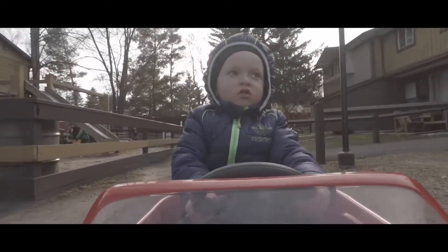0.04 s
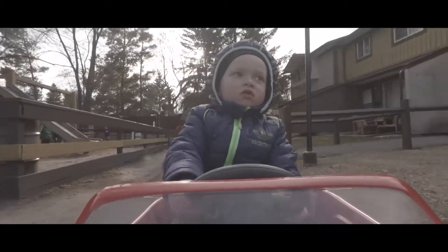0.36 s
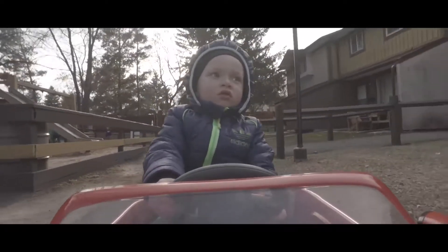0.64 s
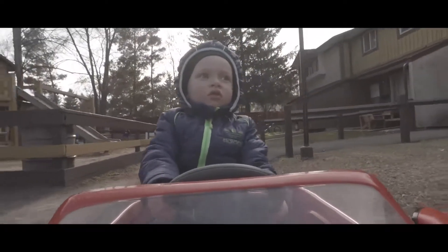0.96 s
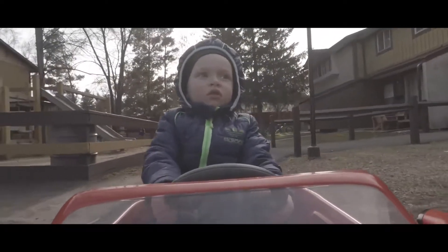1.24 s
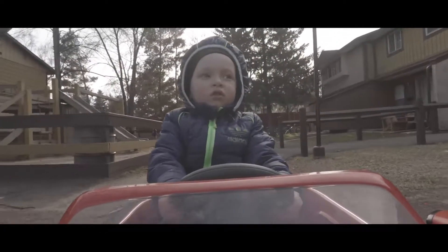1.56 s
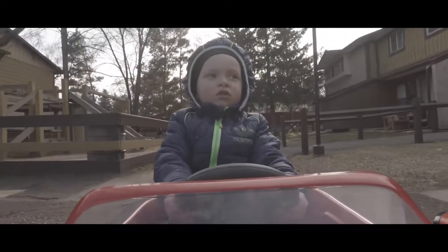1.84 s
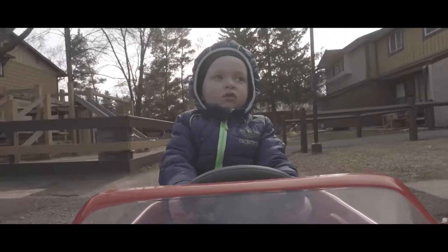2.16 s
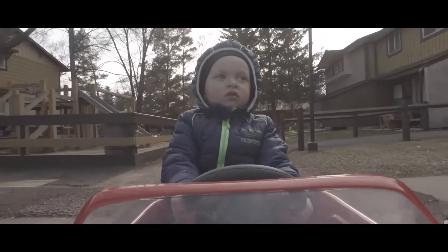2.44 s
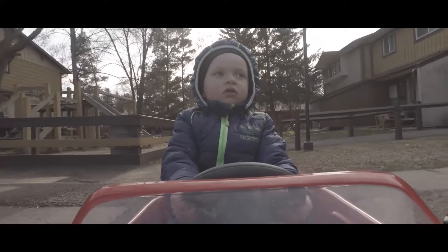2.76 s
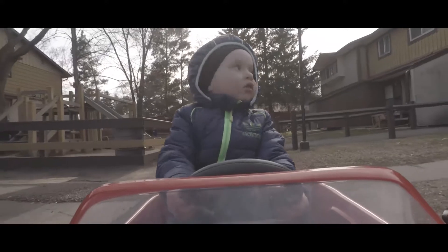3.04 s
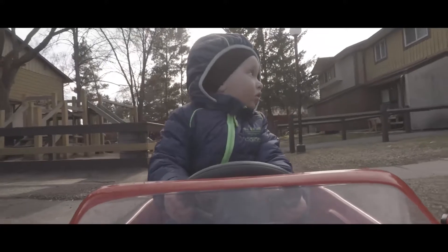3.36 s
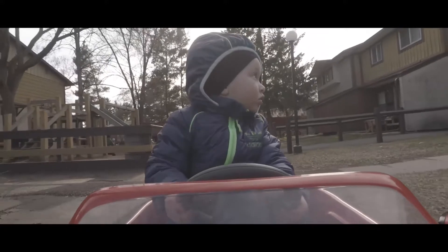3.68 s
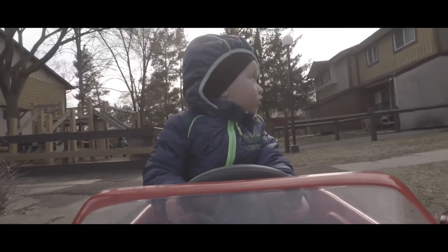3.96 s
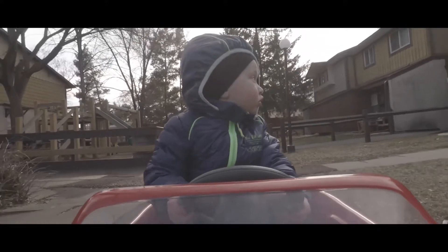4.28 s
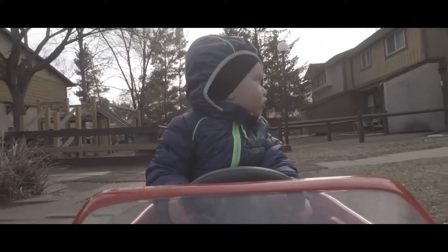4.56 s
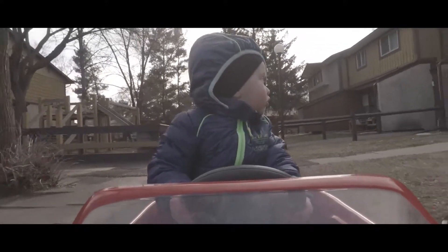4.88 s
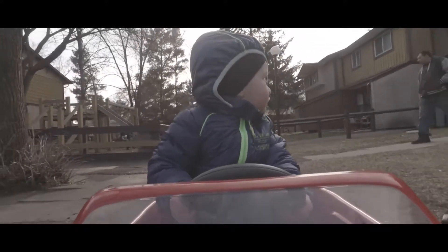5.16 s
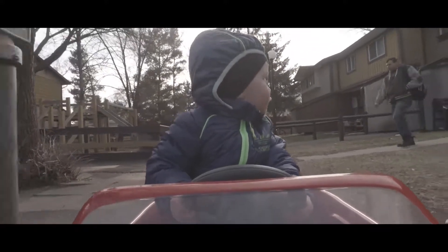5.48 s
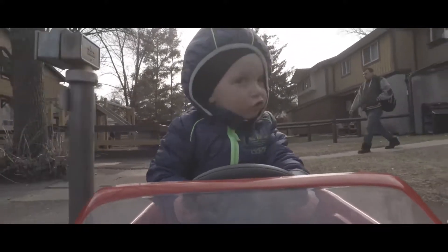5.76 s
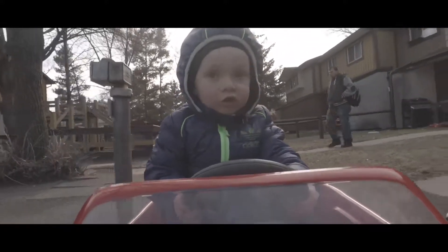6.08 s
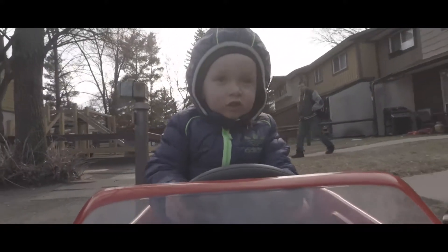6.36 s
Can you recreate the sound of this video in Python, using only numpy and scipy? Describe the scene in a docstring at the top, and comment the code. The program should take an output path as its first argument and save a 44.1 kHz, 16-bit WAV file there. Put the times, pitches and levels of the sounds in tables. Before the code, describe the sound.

A child's electric ride-on car rolls along a paved path, heard up close from its bonnet. Hard plastic wheels crunch over grit and make the hollow body boom. The gear whine climbs in the first second, with thin squeals, while bumps thump and clatter. The car eases off slightly as stones and loose parts tick, then picks up again, takes two heavier thumps and keeps rolling.

```python
"""A child drives a small electric ride-on car along a paved path, heard from its bonnet.
From the start, hard plastic wheels crunch over grit and set the hollow body booming. In the first
second the gear whine climbs with the speed, thin squeals come and go, and bumps thump and clatter.
The car eases off while stones and loose parts tick, then picks up again after 3.3 s. The heaviest
thumps land near 3.7 s and 4.9 s, and it is still rolling when the sound ends at 6.5 s."""
import sys
import numpy as np
from scipy import signal
from scipy.fft import rfft, irfft, next_fast_len
from scipy.io import wavfile
from scipy.ndimage import uniform_filter1d

SR = 44100
rng = np.random.default_rng(int(sys.argv[2]) if len(sys.argv) > 2 else 0)


def digitize_waveform(pressure):
    """Quantize a signal to 16-bit integers and store it at the path in sys.argv[1].

    Rows of a 2-D input are taken as channels; values are limited to [-1, 1].
    """
    field = np.atleast_2d(pressure).T
    bounded = np.clip(field, -1, 1)
    quanta = np.round(bounded * 32767).astype(np.int16)
    wavfile.write(sys.argv[1], SR, quanta)


N = 287532
TIME = np.arange(N) / SR

# Levels in the tables are relative: each layer adds its own trim.
# EQ of the hiss: freq_hz, gain_db
HISS_EQ = [(3000, 7.5), (7000, -6), (9300, 1), (11500, -5.5), (14000, -9.5), (15500, -11)]
# grains snapping under a wheel: start_s, peak_db
SNAP_CUES = [(0.2458, -45), (2.146, -56), (2.2185, -51), (3.6905, -48), (3.931, -55), (4.155, -52),
             (4.5376, -56), (5.9219, -56), (6.03, -50)]
# stones and loose parts ticking: start_s, crack_db, ping_db, pitch_hz, decay_s
TICK_CUES = [(0.2464,-27,-28,4400,0.0027), (.253,-26,-18.5,1250,0.0033), (0.553,-28,-35,3770,.003),
             (.843,-37,-39,3600,.003), (0.891,-34,-39,3740,.003), (1.1306,-41,-37,2000,.003),
             (1.34,-25.5,-37,4570,0.0045), (1.5294,-30.5,-43,3580,0.0026), (1.6284,-29,-37,3610,.003),
             (1.653,-29,-39,3500,.004), (1.906,-24,-37,3820,0.0018), (2.157,-39,-33,2100,.003),
             (2.2476,-26,-38,3350,0.0028), (2.419,-26,-39,3900,.003), (2.4455,-34,-37,4300,.003),
             (2.475,-36,-36.5,4230,0.0043), (2.5235,-29.5,-40,3840,0.0024), (3.124,-23.5,-31,3730,0.0025),
             (3.207,-30,-44,3650,0.0028), (3.2893,-24,-27.5,3860,0.0024), (3.408,-22.5,-29.5,4040,0.0043),
             (3.693,-27,-35.5,3310,0.012), (3.944,-35,-37,3670,.003), (4.156,-20,-31,2600,.003),
             (4.357,-27.5,-31.5,3290,.006), (4.4395,-28,-35,3600,0.0028), (4.7941,-27,-35,3870,0.0027),
             (5.2155,-26.5,-36,4500,.003), (5.2413,-29,-41,4200,.002), (5.2904,-32,-39,3600,.004),
             (5.3712,-23,-33,3750,0.013), (5.8416,-28,-37,4610,0.0036), (6.4445,-32,-37,3600,.003),
             (6.4693,-27.5,-38,2270,.003), (6.492,-24.5,-43,3500,.003)]
# squeals of the drive: start_s, length_s, from_hz, to_hz, level_db
SQUEAL_CUES = [(.12, 0.11, 4120, 4420, -49), (0.248, 0.18, 3520, 3540, -50),
               (0.286, 0.27, 1820, 1780, -44.5), (0.54, 0.21, 1630, 1570, -43),
               (0.558, .1, 1340, 1340, -42), (1.218, .13, 4300, 4200, -52), (0.82, 0.15, 4300, 4200, -53),
               (1.23, 0.28, 1350, 1355, -42.5), (3.057, 0.3, 2320, 2360, -53),
               (4.577, 0.16, 1910, 1880, -49.5)]
# bumps in the path: start_s, thump_db, pitch_hz, ring_s, clatter_db, crack_db
BUMP_CUES = [(.193,-27,318,.005,-24,-26), (0.244,-20.5,310,.006,-14.5,-18), (0.255,-7,306,0.0065,-20,-22.5),
             (0.334,-11.5,340,0.0058,-32,-40), (.372,-25,320,.004,-31,-28),
             (0.451,-22,323,0.0033,-18.5,-29), (.467,-4.5,295,0.0046,-27,-28), (0.608,-18,333,.004,-26,-38),
             (.652,-7.5,334,0.0037,-25.5,-28), (.722,-12,330,0.0052,-26,-36),
             (.768,-6.5,327,0.0046,-23,-36), (.783,-7.5,347.5,.016,-27,-23.5),
             (1.045,-19,324,0.0056,-22.5,-30), (1.197,-22,330,0.0049,-25,-29),
             (1.234,-11.5,341,0.012,-25,-28), (1.38,-13.5,306,0.0037,-22,-32),
             (1.412,-16,331,0.0095,-22,-26), (1.77,-11,336,.005,-21,-29), (2.125,-15.5,238,.012,-23,-38),
             (2.188,-11,335,0.004,-18,-29), (2.353,-24,313,.004,-29,-42), (2.48,-6.5,284,.003,-23.5,-26),
             (2.79,-23,315,0.0044,-26.5,-27.5), (2.828,-15,339,0.0088,-20.5,-35),
             (2.864,-18,320,0.0026,-23.5,-27), (3.208,-19,325,0.0037,-31,-38),
             (3.657,-21,315,.0044,-26,-30), (3.686,-18,315,0.0035,-21,-29),
             (3.697,-4,329,0.0052,-23.5,-23.5), (3.868,-13,278,.004,-25,-37),
             (3.978,-11.5,333,0.014,-21.5,-27.5), (4.049,-12.5,329,0.0099,-18.5,-37),
             (4.354,-8.5,302,0.0024,-29,-38), (4.365,-7.5,322,0.0094,-24.5,-29),
             (4.8,-4.5,325,0.0021,-37,-35), (4.853,-1,316,0.0032,-26,-31), (4.94,-15,316,.0036,-28,-30),
             (5.118,-12,315,0.004,-22.5,-33), (5.142,-18,320,0.0053,-24,-25.5), (5.25,-19,320,.005,-19,-28),
             (5.257,-6.5,303,0.0095,-24,-31), (5.581,-16,311,0.0044,-26,-36),
             (6.03,-13.5,330,0.0093,-21,-30), (6.238,-9,316.4,0.012,-20,-37.5),
             (6.29,-14,296,.0034,-19,-21.5), (6.436,-28,320,.004,-21,-24)]

# EQ of each kind of contact: freq_hz, gain_db
SNAP_EQ = [(2000, -1), (5000, 5.5), (6900, 3.5), (7800, 6), (8700, -2.5), (10500, -6.5), (13000, -5),
           (15500, -14)]  # very bright
TICK_EQ = [(700, -22.5), (1500, 0), (2500, 1.5), (3400, 0.5), (4400, 2.5), (5600, -13.5), (7000, -25),
           (10000, -35), (13000, -34), (16000, -42.5)]  # hard upper mids
GRIT_EQ = [(900, -26), (1600, 8), (2250, 6), (2900, -2.5), (3450, 7.5), (3850, -3.5), (4300, -2.5),
           (4900, -8), (5500, -10), (6000, -15), (6900, -25.5), (9000, -26.5), (11000, -41.5),
           (13000, -36.5), (15500, -38)]  # sandy crackle
CRUNCH_EQ = [(300, -30.5), (470, -0.5), (560, -1), (640, -3), (730, -5.5), (880, -7.5), (1050, -10),
             (1250, -9), (1450, -16), (1900, -21), (2600, -27), (4000, -25), (7000, -57), (15000, -56)]  # hollow mids

# resonances: pitch_hz, width_hz, gain_db
SWAY_MODES = [(26, 38, -9.5), (43.2, 23, -5), (58, 20, -0.5)]  # the car rocking on its wheels
BODY_MODES = [(75.86, 10, 5), (98, 16, -2), (112.7, 14, -2.5)]  # the whole hollow body
PAN_MODES = [(163.4, 17, -0.5), (173.8, 12, 0), (203.5, 24, -3.5)]  # the floor pan
PANEL_MODES = [(186, 57, 1), (239.6, 26, 1.5), (285.4, 31, 3), (309.3, 39, 1), (337, 20, 5.5),
               (403, 22, -1)]  # the plastic panels
WHEEL_MODES = [(547, 13, 7), (597.4, 25, 0.5), (653.5, 36, 1.5), (739, 25, 2.5), (1030, 47, -1)]  # the hollow wheels
PEBBLE_MODES = [(1950, 760, -1), (2460, 1400, -0.5), (3200, 370, -2), (3600, 530, 1.5), (4220, 890, -3)]  # clicks of larger stones

# level rides of the ringing plastic: time_s, level_db
LOW_BOOM_RIDE = [(0.0, -11.5), (0.86, -21), (0.99, -15.5), (1.18, -25), (1.35, -15.5), (1.89, -16.5),
                 (2.17, -8.5), (2.52, -21.5), (2.63, -7), (2.87, -20), (3.11, -13.5), (3.36, -21),
                 (3.48, -8.5), (3.58, -29.5), (3.79, -5), (3.92, -12), (4.06, -8), (4.26, -24),
                 (4.39, -5.5), (4.53, -15.5), (4.95, -5.5), (5.13, -18), (5.97, -14), (6.06, -17),
                 (6.2, -12.5), (6.51, -10)]  # lowest body mode
HIGH_BOOM_RIDE = [(0.0, -14.5), (0.28, -13), (0.45, -9.5), (0.68, -25), (0.79, -14), (1.16, -19),
                  (1.42, -12), (1.62, -21), (2.03, -10.5), (2.13, -15), (2.53, -16.5), (2.65, -23),
                  (2.79, -8), (3.01, -16), (3.11, -18), (3.45, -13.5), (3.63, -9.5), (3.72, -20.5),
                  (3.91, -11), (4.11, -17), (4.24, -12), (4.42, -12), (4.74, -15), (4.98, -18.5),
                  (5.1, -12.5), (6.51, -14)]  # upper body modes
PAN_RIDE = [(0,-27), (.35,-29.5), (.75,-24.5), (1.1,-35.5), (3.4,-34), (3.7,-25.5), (4.1,-29), (4.4,-23),
            (4.6,-32.5), (5.5,-30.5), (6.52,-38)]  # boom of the floor pan
WHEEL_RIDE = [(0.0, -38.5), (0.23, -29.5), (0.36, -45), (0.76, -40), (0.78, -33), (1.22, -39),
              (1.27, -34.5), (1.94, -40), (2.14, -29.5), (2.32, -37.5), (3.0, -35), (3.03, -41),
              (3.63, -33), (3.7, -24), (3.74, -35.5), (4.34, -32.5), (4.38, -24), (4.43, -48), (4.68, -40),
              (4.7, -35.5), (5.34, -35), (5.48, -46), (5.63, -35.5), (6.17, -37), (6.34, -28.5),
              (6.52, -46)]  # drone of the wheels
# roughness of the paving, as the levels it raises: time_s, drumming_db, crunch_db
PAVING_RIDE = [(0.0, -24.5, -39), (0.2, -16.5, -33), (0.49, -21.5, -37), (0.87, -22.5, -34),
               (1.03, -20.5, -35), (1.22, -23.5, -37), (1.83, -23, -37.5), (2.2, -20, -34),
               (2.49, -21.5, -40), (2.76, -25.5, -37), (3.18, -23, -37), (3.58, -22, -38),
               (3.94, -20.5, -37.5), (4.23, -20, -37), (4.39, -19.5, -35), (4.59, -22.5, -40.5),
               (4.78, -20.5, -36.5), (4.92, -23, -36), (5.21, -17, -32), (5.43, -21.5, -36.5),
               (6.19, -21, -36.5), (6.52, -21, -34)]
# load on the gears, as levels of partials 1-3 and 4-5: time_s, whine_db, whistle_db
LOAD_RIDE = [(0,-37,-48), (.34,-42.5,-46), (.47,-49.5,-49), (.75,-41,-52), (1.03,-41,-48), (1.08,-42,-45),
             (1.4,-40.5,-43), (2.0,-49,-45.5), (2.5,-42.5,-42), (3.2,-44.5,-45), (3.55,-43.5,-40),
             (4.2,-45.5,-48), (4.55,-45,-51), (4.85,-41,-39.5), (5.35,-46,-43.5), (5.9,-40,-43.5),
             (6.35,-40.5,-49), (6.52,-55,-41)]

# speed of the drive, as gear teeth meeting per second: time_s, mesh_hz
MESH_RATE = [(0,1020),(.13,1040),(.17,1095),(.25,1085),(.28,1168),(.38,1187),(.5,1290),(.68,1355),(1,1303),(1.15,1258),(1.5,1224),(1.95,1257),(3.3,1208),(3.5,1275),(3.65,1302),(4.5,1368),(5.4,1275),(5.62,1305),(5.85,1268),(6.3,1320),(6.52,1380)]
# the two rear gearboxes: speed_ratio, gain_db
REAR_DRIVES = [(1, -1), (1.016, -8)]
# partials of the tooth rate: harmonic, gain_db, roughness at full rattle
GEAR_PARTIALS = [(1, -1, 0.57), (2, -3.5, 0.38), (3, -6, 0.58), (4, -2, 1.1), (5, -13, 0.35)]
# how the gear housing radiates: freq_hz, gain_db
HOUSING_EQ = [(1000, -3.5), (1120, 4.5), (1250, -6.5), (1400, -7), (2080, -0.5), (2220, 5.5), (2310, -6.5),
              (2400, -5), (2510, -3.5), (2600, -1.5), (2700, -4.5), (3100, -4), (3330, -2.5), (3480, 3.5),
              (3560, 4), (3720, -0.5), (3900, -4), (4300, -8.5), (4600, -11), (4900, -30.5), (5400, -12),
              (5850, -4.5), (6200, -6.5), (6450, -12.5), (6700, -20), (8500, -23.5)]

PINION_TEETH, IDLER_RATIO = 17, 5.15  # tooth contacts per cycle of the rotor and of the idler hum


def from_db(db):
    """Decibels to gain."""
    return 10 ** (np.asarray(db) / 20)


def rms_one(x):
    """Scale to unit power."""
    return x / np.sqrt(np.mean(x ** 2) + 1e-20)


def leveller(x, seconds):
    """Hold a signal near unit power over a sliding window."""
    power = np.abs(uniform_filter1d(x * x, max(int(seconds * SR), 2)))
    return x / np.sqrt(power + 1e-12)


def automation(rows):
    """Each column of a timed curve, at every sample."""
    times, *columns = np.transpose(rows)
    return [np.interp(TIME, times, column) for column in columns]


def eq_db(eq, hz):
    """Read an EQ curve on a log-frequency axis."""
    freqs, db = np.transpose(eq)
    return np.interp(np.log(np.maximum(hz, 1)), np.log(freqs), db)


def noise():
    """White noise for the whole scene."""
    return rng.standard_normal(N)


def drift(rate):
    """Smooth random modulation of spread 1 that changes about rate times a second."""
    step, run_in = 20, 4000  # samples per control point; points left to settle
    pole = np.exp(-2 * np.pi * rate * step / SR)
    white = rng.standard_normal(N // step + run_in + 2)
    slow = signal.lfilter([1], [1, -2 * pole, pole * pole], white)[run_in:]
    return np.interp(np.arange(N) / step, np.arange(len(slow)), rms_one(slow))


def colour(x, eq):
    """Minimum-phase EQ, so nothing rings ahead of an attack."""
    size = next_fast_len(len(x) + 4096, True) * 2
    freqs = np.arange(size // 2 + 1) * SR / size
    cepstrum = irfft(np.log(from_db(eq_db(eq, freqs))))
    cepstrum[1:size // 2] *= 2
    cepstrum[size // 2 + 1:] = 0
    return irfft(rfft(x, size) * np.exp(rfft(cepstrum)))[:len(x)]


def resonate(x, modes):
    """Ring a bank of parallel resonators."""
    out = 0
    for hz, width_hz, db in modes:
        radius = np.exp(-np.pi * width_hz / SR)
        feed = np.array([1, 0, -1]) * (1 - radius ** 2) / 2
        feedback = [1, -2 * radius * np.cos(2 * np.pi * hz / SR), radius ** 2]
        out = out + from_db(db) * signal.lfilter(feed, feedback, x)
    return out


def band(x, low_hz, high_hz, order=3):
    """Band-pass."""
    return signal.sosfilt(signal.butter(order, [low_hz, high_hz], "band", fs=SR, output="sos"), x)


def place(out, start_s, sound, peak_db):
    """Lay a one-shot into the track at the given peak level."""
    i = max(round(start_s * SR), 0)
    out[i:i + len(sound)] += (from_db(peak_db) * sound / np.abs(sound).max())[:N - i]


def burst(decay_s):
    """A quarter second of contact noise that dies by 1/e in decay_s."""
    t = TIME[:SR // 4]
    return rng.standard_normal(len(t)) * np.exp(-t / decay_s)


def grains(per_s, spread_db):
    """Random contacts, many small and a few large; unit power."""
    sizes = from_db(spread_db * np.minimum(rng.exponential(1, N), 5))
    signs = rng.choice([-1, 1], N)
    return rms_one(sizes * signs * (rng.random(N) < per_s / SR))


def hiss():
    """A faint, steady bed of treble."""
    return from_db(-60) * rms_one(colour(noise(), HISS_EQ))


def snaps():
    """A crushed grain gives a tiny, very bright click."""
    out = np.zeros(N)
    for start_s, db in SNAP_CUES:
        place(out, start_s, colour(burst(decay_s=0.0016), SNAP_EQ), db + 13.5)
    return out


def squeals():
    """The drive gives thin, wavering tones that swell and fade."""
    out = np.zeros(N)
    waver = 1 + 0.019 * drift(76)
    for start_s, length_s, from_hz, to_hz, db in SQUEAL_CUES:
        progress = np.clip((TIME - start_s) / length_s, 0, 1)
        hz = (from_hz + (to_hz - from_hz) * progress) * waver
        swell = from_db(db) * np.sqrt(2) * np.sin(np.pi * progress)
        out += swell * np.sin(2 * np.pi * np.cumsum(hz) / SR)
    return out * from_db(2.5 * drift(35))


def ticks():
    """Stones and loose parts strike with a sharp crack and a short ping."""
    out, t = np.zeros(N), TIME[:SR // 4]
    attack = 1 - np.exp(-t / 0.0005)
    for start_s, crack_db, ping_db, pitch_hz, decay_s in TICK_CUES:
        crack = colour(burst(decay_s=0.0018) + 0.25 * burst(decay_s=0.006), TICK_EQ)
        ping = attack * np.exp(-t / decay_s) * np.sin(2 * np.pi * pitch_hz * t)
        place(out, start_s, crack, crack_db + 2)
        place(out, start_s, ping, ping_db + 2)
    return out


def motor():
    """The unbalanced rotor hums once a turn; the gear train adds a higher, fainter hum."""
    mesh_hz, = automation(MESH_RATE)
    tooth_phase = 2 * np.pi * np.cumsum(mesh_hz * (1 + 0.012 * drift(7.3))) / SR
    rotor = from_db(-28 + 2.5 * drift(1.9)) * np.sin(tooth_phase / PINION_TEETH)
    idler = from_db(-33 + 1.4 * drift(2.3)) * np.sin(tooth_phase / IDLER_RATIO)
    return np.sqrt(2) * (rotor + idler)


def ringing(modes, band_hz, window_s):
    """Modes kept ringing by noise, band-limited and levelled."""
    return leveller(band(resonate(noise(), modes), *band_hz), window_s)


def drones():
    """Steady rolling keeps the hollow wheels and the floor pan ringing in their own modes."""
    wheel_db, = automation(WHEEL_RIDE)
    pan_db, = automation(PAN_RIDE)
    wheels = ringing(WHEEL_MODES, band_hz=(490, 864), window_s=0.13)
    pan = ringing(PAN_MODES, band_hz=(134, 213), window_s=0.11)
    return from_db(wheel_db - 5) * wheels + from_db(pan_db) * pan


def rough_tone(phase, roughness):
    """A tone frayed into close neighbours, as no two teeth meet alike."""
    in_step = 1 + roughness * drift(110)
    across = roughness * drift(110)
    return (in_step * np.sin(phase) + across * np.cos(phase)) / np.sqrt(1 + 2 * roughness ** 2)


def gearbox(mesh_hz, whine_db, whistle_db):
    """Tooth contacts give a row of partials; backlash makes them waver and flutter."""
    # the springy drive train hunts around its speed
    hunting = rms_one(band(drift(34), low_hz=5.3, high_hz=29.8, order=1))
    tooth_hz = mesh_hz * (1 + 0.016 * hunting + 0.005 * drift(130))
    phase = 2 * np.pi * np.cumsum(tooth_hz) / SR
    # the pinion runs out of true, which puts sidebands on each partial
    phase += 0.12 * np.sin(phase / PINION_TEETH)
    rattle = np.interp(mesh_hz, (1100, 1330), (0.25, 1))  # faster teeth rattle more in their play
    out = 0
    for (harmonic, db, roughness), load_db in zip(GEAR_PARTIALS, [whine_db] * 3 + [whistle_db] * 2):
        housing_db = eq_db(HOUSING_EQ, harmonic * tooth_hz)
        flutter_db = 3.27 * drift(27)
        gain = from_db(load_db + db + housing_db + flutter_db + 1)
        out += gain * rough_tone(harmonic * phase, rattle * roughness)
    return out


def gears():
    """Each rear wheel has a drive of its own; the two whines sit slightly detuned."""
    whine_db, whistle_db = automation(LOAD_RIDE)
    mesh_hz, = automation(MESH_RATE)
    return sum(from_db(db) * gearbox(ratio * mesh_hz, whine_db, whistle_db) for ratio, db in REAR_DRIVES)


def body():
    """The low end: the body rocks on its wheels and its hollow modes boom in turns."""
    low_db, = automation(LOW_BOOM_RIDE)
    high_db, = automation(HIGH_BOOM_RIDE)
    sway = ringing(SWAY_MODES, band_hz=(12, 75), window_s=0.11)
    low = ringing(BODY_MODES[:1], band_hz=(57.7, 100.6), window_s=0.1)
    high = ringing(BODY_MODES[1:], band_hz=(86.8, 138.8), window_s=0.11)
    boom = from_db(-18.5) * sway + from_db(low_db - 4) * low + from_db(high_db - 4.5) * high
    wet = 0.42  # parallel compression: one mode gives way when another swells
    return (1 - wet) * boom + wet * boom.std() * leveller(boom, seconds=0.03)


def panels(force):
    """The plastic panels ring under a force."""
    return band(resonate(force, PANEL_MODES), low_hz=127, high_hz=355.6)


def pebbles(per_s):
    """Single stones flick against the plastic, each at one of five short notes; unit power."""
    per_note = per_s / len(PEBBLE_MODES)
    clicks = sum(resonate(grains(per_note, spread_db=2.2), [mode]) for mode in PEBBLE_MODES)
    return rms_one(colour(clicks, TICK_EQ))


def rolling():
    """The wheels drum on the panels, crunch over grit and flick up pebbles."""
    drumming_db, crunch_db = automation(PAVING_RIDE)
    swing_db = crunch_db - crunch_db.mean()  # grit and pebbles follow the crunch
    jolts = from_db(1.5 * drift(16))  # small unevenness shakes panels, wheels and grit together
    pressure = from_db(1.2 * drift(36))  # hard wheels hop, so the contact flutters
    stones = grains(per_s=700, spread_db=3.5)
    # each stone sets off a few ms of buzzing in the loose hubs
    buzz = rms_one(signal.fftconvolve(stones, burst(decay_s=0.0021))[:N])
    impacts = np.sqrt(uniform_filter1d(buzz ** 2, size=60).clip(0))
    contact = pressure * (1.6 + impacts)
    drumming = leveller(panels(contact * noise()), seconds=0.06)
    crunch = leveller(colour(contact * noise() + 0.92 * stones, CRUNCH_EQ), seconds=0.079)
    sand = grains(per_s=1700, spread_db=4.0)  # fine crackle between the stones
    grit = leveller(colour(contact * noise() + sand, GRIT_EQ), seconds=0.41)
    wheels = (from_db(drumming_db - 1.23) * drumming
              + from_db(crunch_db - 1.5) * crunch
              + from_db(swing_db - 44.5) * grit)
    return jolts * wheels + from_db(swing_db - 51.5) * pebbles(per_s=70)


def bump_tails(trim_db, decay_s, attack_s=0.0029):
    """An envelope that jumps at each bump, in step with its thump level, and dies away."""
    envelope = np.zeros(N)
    for start_s, thump_db, *_ in BUMP_CUES:
        age = np.maximum(TIME - start_s, 0)
        attack = 1 - np.exp(-(age / attack_s) ** 2)
        envelope += from_db(thump_db + trim_db) * attack * np.exp(-age / decay_s)
    return envelope


def aftershake():
    """Each thump leaves the panels shaking and the hollow wheels booming for a moment."""
    shaking = leveller(panels(noise()), seconds=0.021)
    booming = leveller(band(noise(), low_hz=517, high_hz=760, order=2), seconds=0.011)
    return (bump_tails(trim_db=-18.5, decay_s=0.016) * shaking
            + bump_tails(trim_db=-28.5, decay_s=0.038) * booming)


def knock(pitch_hz, ring_s):
    """A struck panel swells to its hollow note within ring_s and dies away."""
    t = TIME[:SR // 4]
    return t * np.exp(-t / ring_s) * np.sin(2 * np.pi * pitch_hz * t)


def bumps():
    """A bump knocks on the panels, rings the hollow wheels and shakes the loose plastic."""
    out = np.zeros(N)
    for start_s, thump_db, pitch_hz, ring_s, clatter_db, crack_db in BUMP_CUES:
        place(out, start_s, knock(pitch_hz, ring_s), thump_db - 5)
        place(out, start_s, panels(burst(decay_s=0.013)), thump_db - 6)
        wheel_ring = band(resonate(burst(decay_s=0.003), WHEEL_MODES), low_hz=474, high_hz=1340)
        place(out, start_s, wheel_ring, clatter_db - 10)
        place(out, start_s, colour(burst(decay_s=0.0064), CRUNCH_EQ), clatter_db)
        place(out, start_s, colour(burst(decay_s=0.0062), GRIT_EQ), crack_db - 0.3)
    return out


def scene():
    """The mono mix: hiss, the running car, and the hits on top."""
    bed = hiss() + body() + rolling() + drones() + motor() + gears() + squeals()
    return (bed + bumps() + aftershake() + ticks() + snaps())[None]


def record(dry):
    """Soft-clip the tallest peaks, cut the top and close with a 4 ms fade."""
    ceiling, cutoff_hz = 0.9, 15400
    rounded = dry / (1 + (dry / ceiling) ** 8) ** (1 / 8)
    low_pass = signal.ellip(10, 0.1, 90, cutoff_hz, fs=SR, output="sos")
    fade = np.clip((TIME[-1] - TIME) / 0.004, 0, 1)
    return fade * signal.sosfilt(low_pass, rounded)


dry = scene()
out = record(dry)
digitize_waveform(out)
```